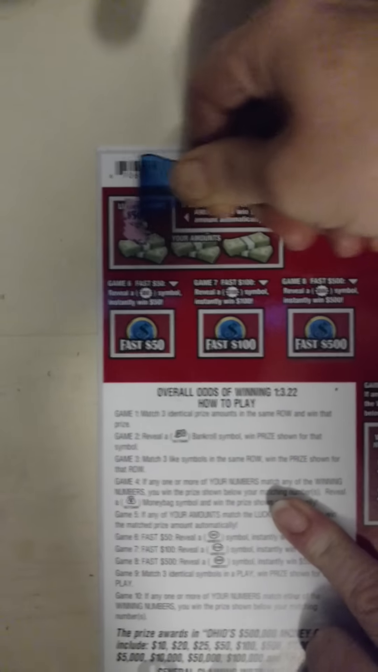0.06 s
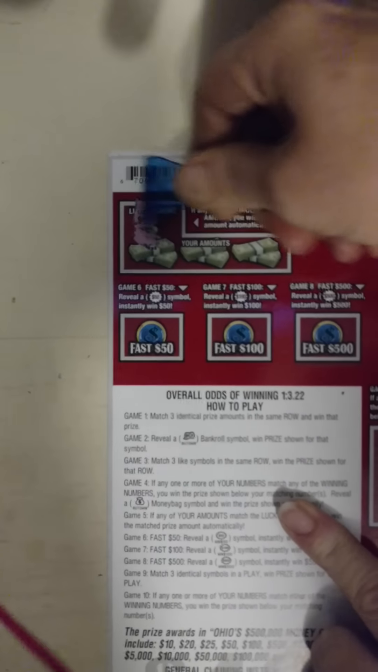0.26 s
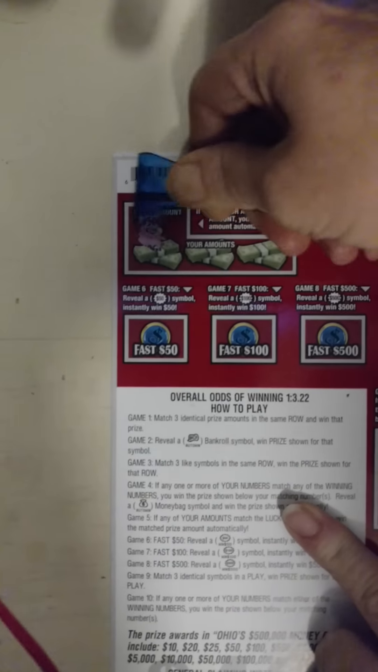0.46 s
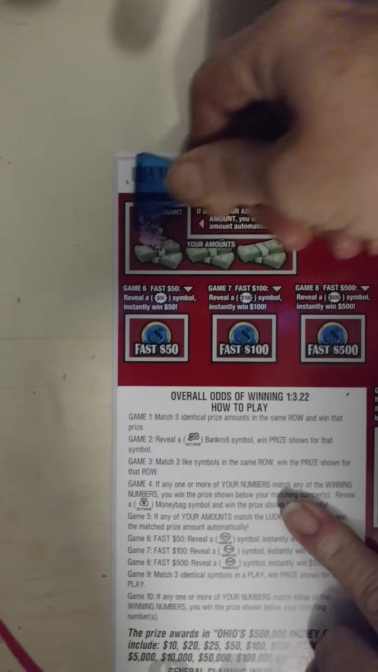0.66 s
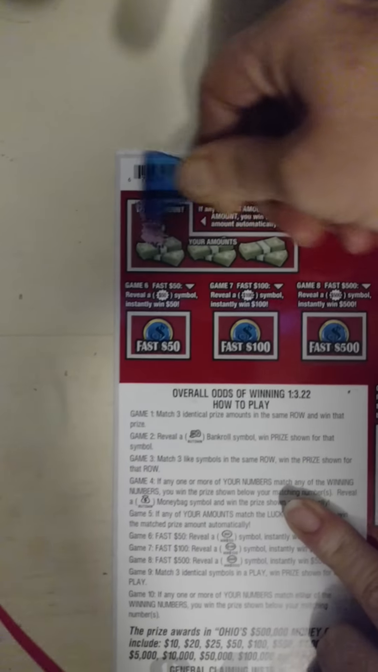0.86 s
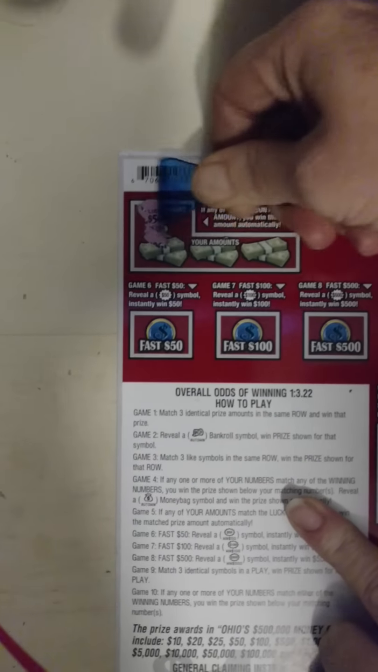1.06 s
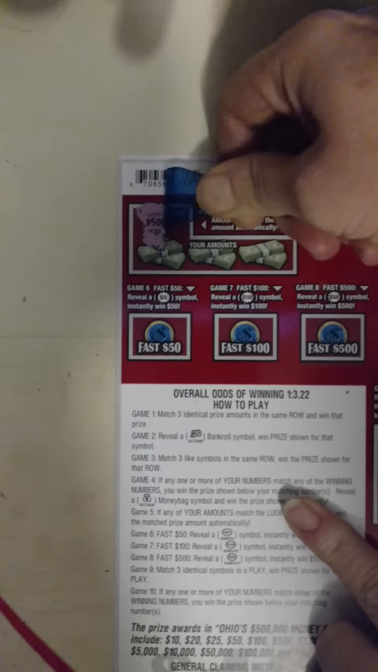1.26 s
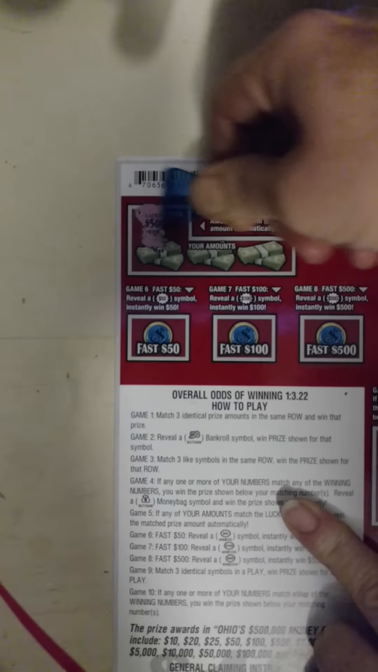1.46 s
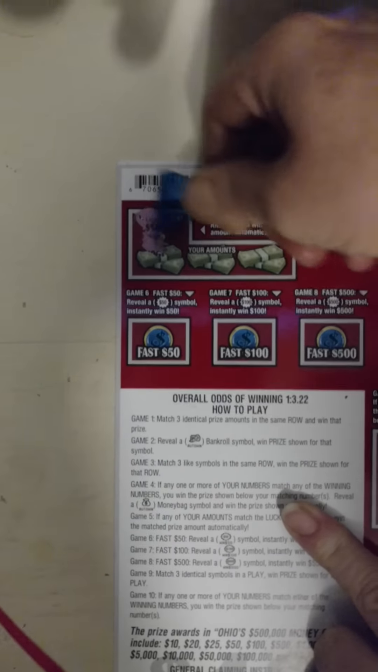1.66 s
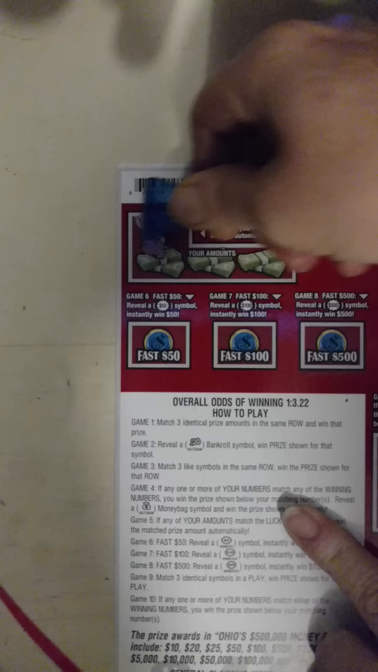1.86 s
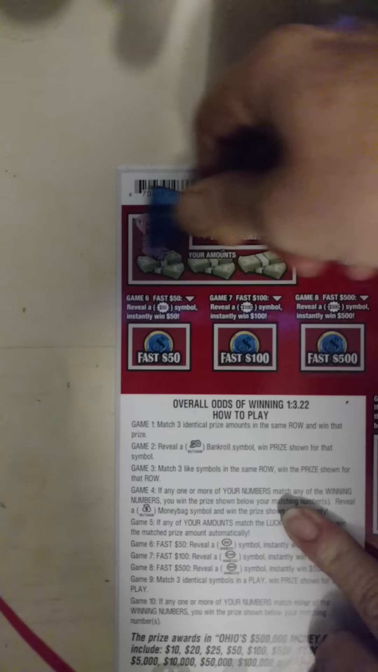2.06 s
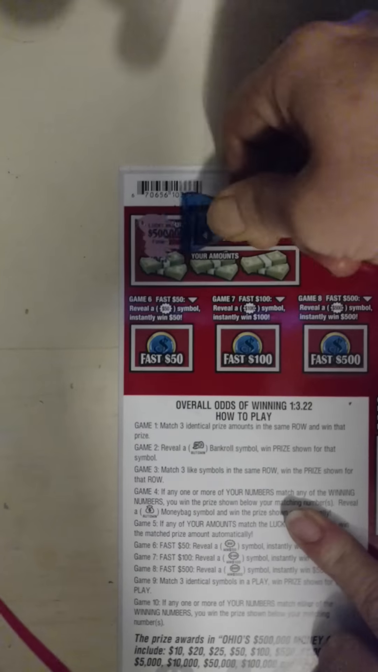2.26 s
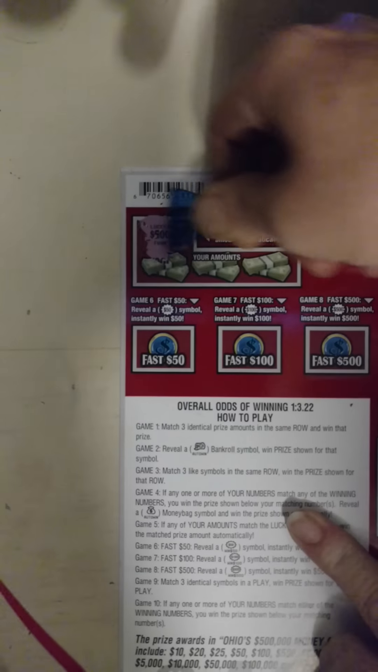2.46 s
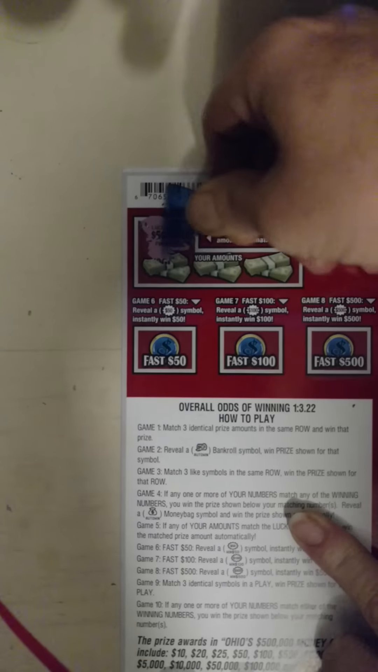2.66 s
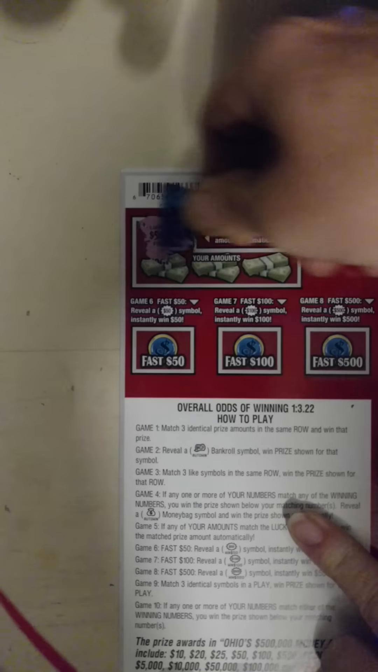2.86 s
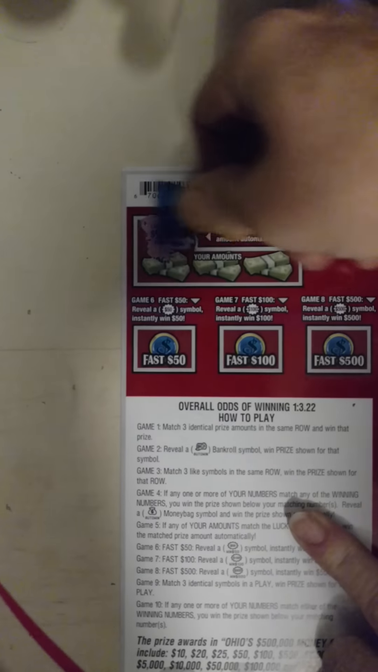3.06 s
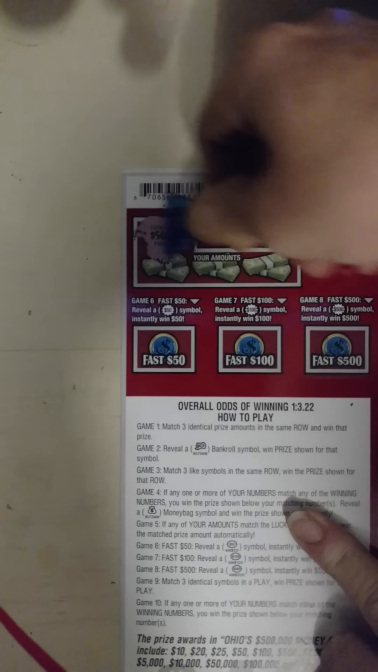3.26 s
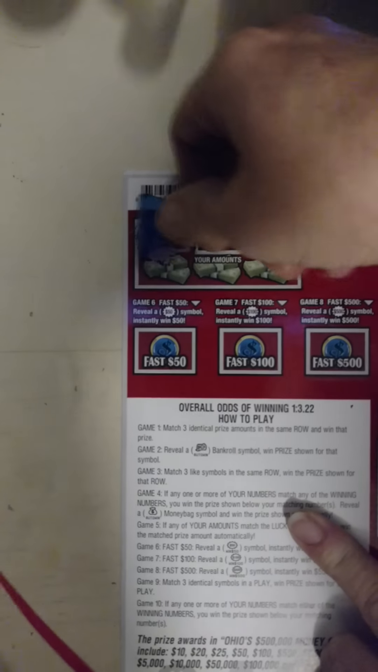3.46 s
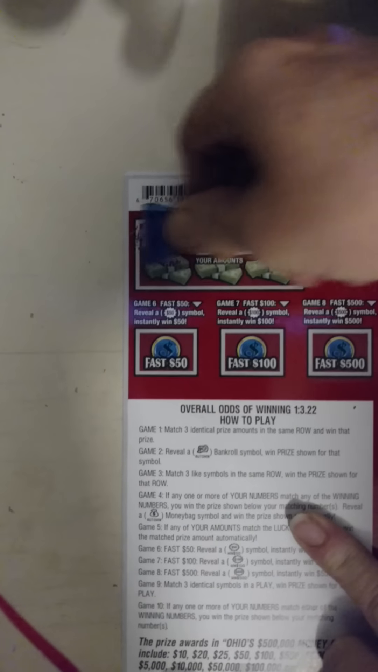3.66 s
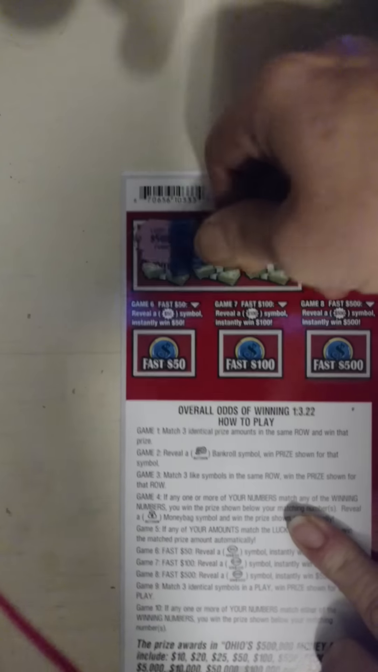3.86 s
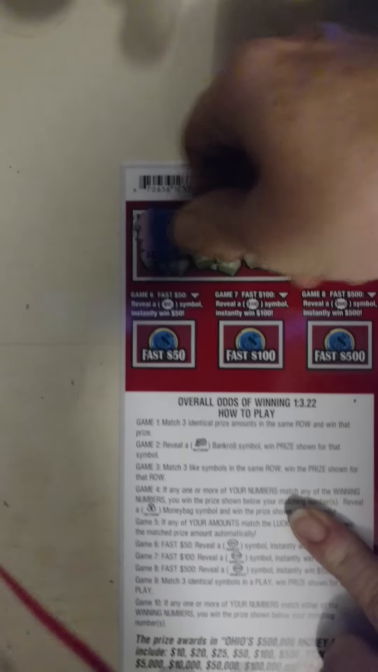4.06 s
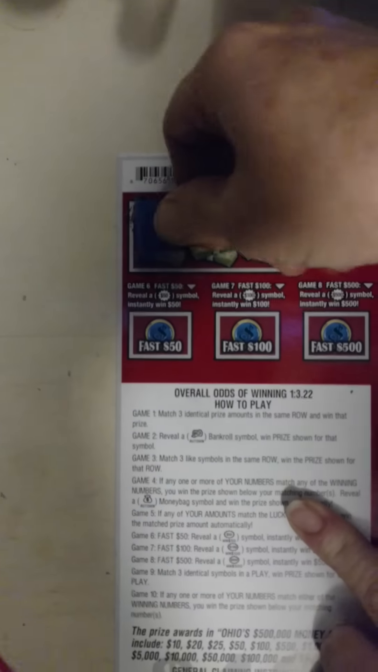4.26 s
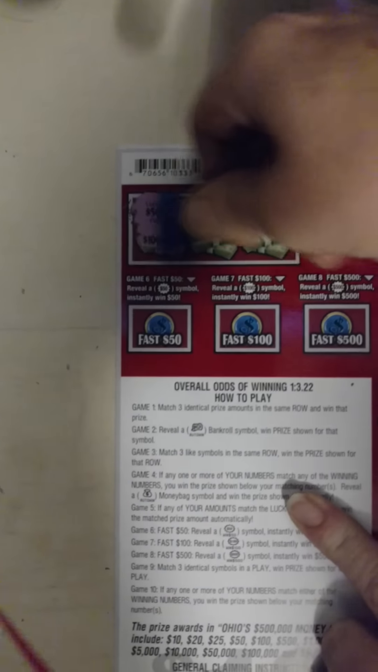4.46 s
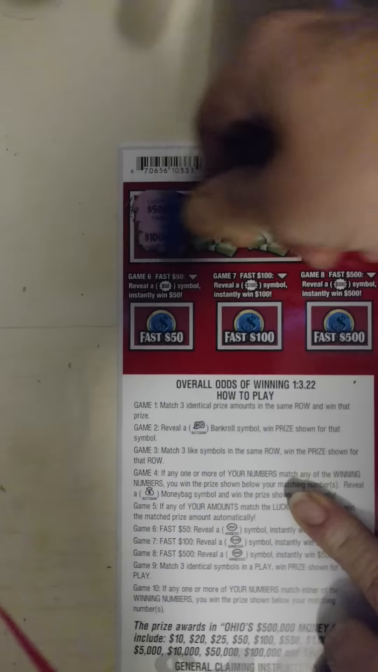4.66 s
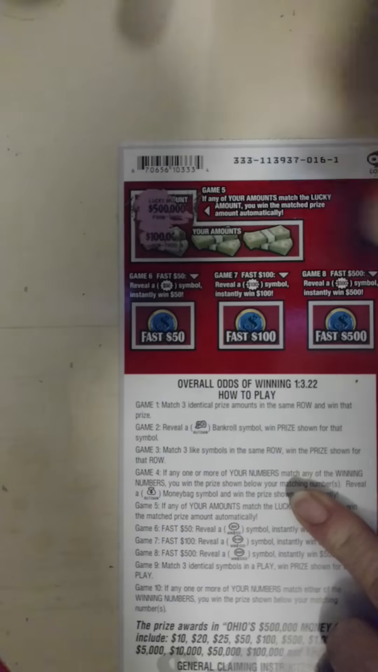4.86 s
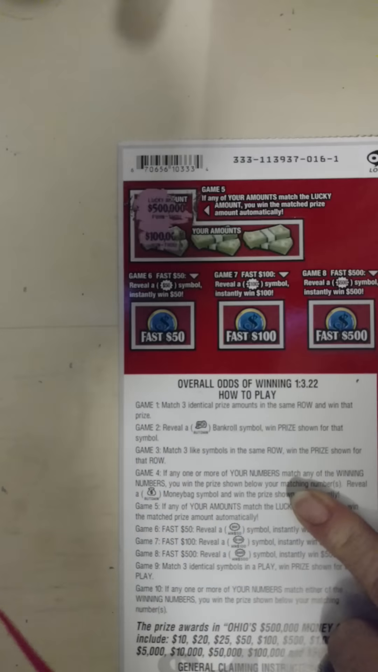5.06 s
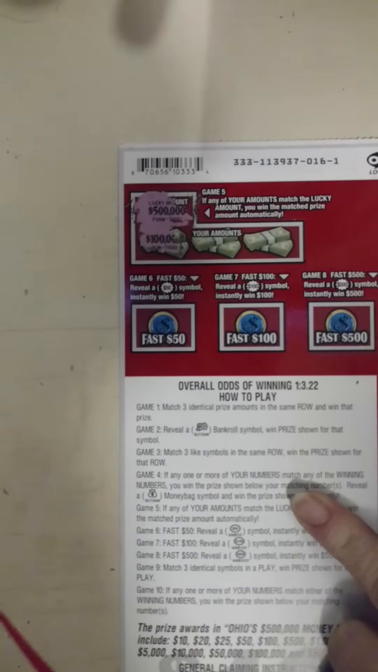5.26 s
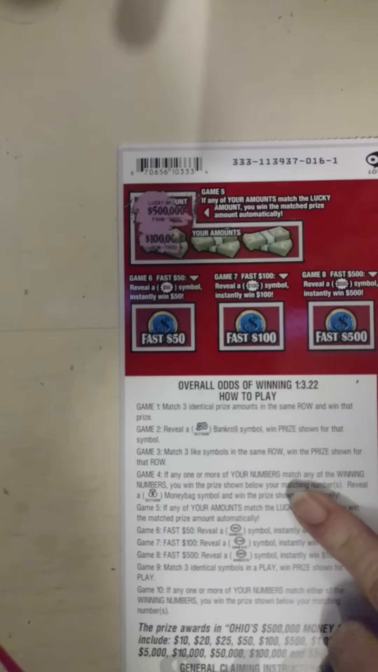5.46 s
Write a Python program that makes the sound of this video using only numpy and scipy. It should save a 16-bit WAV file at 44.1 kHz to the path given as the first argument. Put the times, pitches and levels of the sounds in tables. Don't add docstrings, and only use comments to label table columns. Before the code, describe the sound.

Quick irregular scratching strokes fizz and crackle on a card lying on a hollow table, with edge ticks and soft booms under the hand. One heavier bump comes early. After the last strokes there is a near-quiet moment, a hand lift and sleeve brush, then a tiny plastic clatter. Close, dry indoor stereo pickup with faint room noise.

```python
import sys
import numpy as np
from scipy import signal
from scipy.fft import rfft, irfft, next_fast_len
from scipy.io import wavfile
from scipy.ndimage import map_coordinates

SR = 44100
rng = np.random.default_rng(int(sys.argv[2]) if len(sys.argv) > 2 else 0)


def linear_from_db(decibels):
    return 10 ** (np.asarray(decibels, float) / 20)


def inscribe(sig):
    pcm = np.round(np.clip(np.atleast_2d(sig).T, -1, 1) * 32767)
    wavfile.write(sys.argv[1], SR, pcm.astype(np.int16))


N = 242991

# frequency in Hz, level in dB.
HUSH_SPECTRUM = [(20, 11), (60, 7.5), (150, 4.5), (400, -5), (1000, -15.5), (3000, -17), (10000, -25.5),
                 (16500, -37)]
# frequency in Hz, time to fall 60 dB in seconds.
ROOM_DECAY = [(150, 0.15), (1000, 0.46), (4000, 0.13), (12000, 0.064)]
# frequency in Hz, direct level in dB, scattered level in dB,
# direct phase in radians.
FAR_PORT = [(60, -5, -10, 0.4), (142, -4.5, -21, 0.18), (333, -4.5, -10.5, -0.27), (730, -6, -10, 0),
            (1200, -11, -6.5, -2), (1880, -14, -10.5, -3), (2970, -12.5, -7.5, -6),
            (15000, -20.5, -6, -5.5)]
# frequency in Hz, share fed across to the other port.
CROSSFEED = [(100, .86), (1300, .82), (2600, .92), (4000, .84), (5500, .6), (15000, .5)]

# frequency in Hz, width in Hz, level in dB.
TABLE_MODES = [(113.8, 33, -6), (136.4, 16.3, 3.5), (195.8, 24.8, 1.5), (225.6, 21.9, 2),
               (352.4, 25.3, -11), (471, 22, -19)]
# frequency in Hz, width in Hz, level in dB.
CARD_MODES = [(552, 40.4, 1.5), (643.5, 15.8, 1.5), (726, 61, -1.5), (915, 117, -3), (1117, 92, -3),
              (1332, 94, -0.5), (1620, 95, -0.5), (1848, 106, 0), (2150, 334, -8), (2614, 200, 0.5),
              (3037, 640, -6.5)]
# frequency in Hz, width in Hz, level in dB.
BLADE_MODES = [(3900, 690, -10), (4580, 790, 2), (5060, 893, 5), (6403, 880, 0.5), (8380, 460, -16),
               (9950, 530, -14), (12360, 2840, -15), (14380, 3500, -19)]
# frequency in Hz, width in Hz, level in dB.
SNAP_MODES = [(2700, 1200, -7), (5900, 2600, 0), (10000, 4000, -6), (14000, 4000, -4)]
# frequency in Hz, width in Hz, level in dB.
SCRAPER_MODES = [(3200, 600, -13.5), (3930, 240, 0), (4370, 360, -1.5), (5730, 790, 0.5), (7200, 500, 1.5),
                 (8000, 430, 7), (9200, 700, -2), (9900, 900, -1.5), (11700, 1100, -14), (13400, 1900, -13)]
# frequency in Hz, width in Hz, level in dB.
KNOCK_MODES = [(800, 320, 2), (1760, 630, 5)]
# frequency in Hz, width in Hz, level in dB.
SLEEVE_MODES = [(3280, 770, 3)]

# time in seconds, rustle in dB.
SLEEVE = [
    (4.72, -102),
    (4.96, -73.5),
    (5.1, -73),
    (5.51, -66.5),
]
# time in seconds, pitch in Hz, peak in dB.
SQUEAKS = [
    (4.411, 2230, -35),
]
# time in seconds, low ring in dB, high ring in dB,
# knock in dB.
DROP = [
    (5.3861, -29, -25.5, -55),
    (5.388, -15.5, -23, -55),
    (5.393, -14, -36, -37),
    (5.3966, -9.5, -26, -34.5),
    (5.399, -22, -32, -54),
    (5.4053, -30, -37, -59),
    (5.413, -17, -35, -45),
    (5.423, -26, -37.5, -42),
    (5.427, -27, -41, -25),
    (5.435, -47, -41, -45),
]
# time in seconds, peak in dB.
BUMPS = [
    (.570, -9),
    (5.142, -23),
    (5.419, -42),
    (5.423, -31),
]
# time in seconds, peak in dB.
TICKS = [(0.2143, -38), (0.64, -33.5), (0.7607, -34), (0.821, -38), (0.8603, -41), (0.924, -35.5),
         (1.363, -41), (1.5958, -37), (2.133, -44), (2.2323, -27), (2.9387, -38), (3.018, -46.5),
         (3.2681, -32), (3.4336, -30), (3.5164, -23.5), (3.721, -40)]
# time in seconds, peak in dB, upper modes in dB.
PUSHES = [(0.141, -27, -3.5), (0.451, -31, -3), (0.511, -26.5, -9), (0.567, -32, 1), (0.616, -27.5, -3),
          (0.852, -26.5, -16), (0.944, -26, -5), (1.579, -27.5, -1), (2.063, -31, 2), (2.237, -46, -12),
          (3.365, -27.5, -20), (3.469, -25.5, 7.5), (3.644, -35, 5.5), (3.724, -32, 7), (3.906, -33, 5.5),
          (5.141, -39, -20)]
# time in seconds, snap in dB, push in dB, upper modes in dB.
LANDINGS = [(0.0325, -20, -29.5, -1), (0.2628, -25.5, -29.5, -3.5), (0.3769, -42, -29.5, 3.5),
            (0.6885, -28.5, -41, 5.5), (1.0939, -34.5, -24, -1.5), (1.1989, -32, -29, 1.5),
            (1.3436, -21.5, -23, 4), (1.4527, -27, -29, 2), (1.5041, -41, -31, -1),
            (1.6854, -24, -28.5, 2.5), (1.8075, -30.5, -27.5, 6.5), (1.9494, -20.5, -30, 0),
            (2.1843, -34, -33.5, 2), (2.3301, -38, -26.5, 2), (2.4726, -23.5, -32, 2),
            (2.601, -23, -26, 3.5), (2.7122, -22.5, -34.5, 4), (2.8407, -34, -26, 0.5),
            (2.9883, -61, -38.5, 5.3), (3.0873, -21.5, -21, -0.5), (3.2392, -40.5, -32, -1.5),
            (4.0529, -23.5, -31, 0.5), (4.1788, -54, -35.5, 5), (4.3155, -46, -36, 3.5),
            (4.461, -46, -26.5, 1), (4.6093, -21.5, -36, 3.7)]
# time in seconds, weight of the hand in dB.
DRAG = [(0.0, -38.5), (0.43, -37.5), (0.77, -39), (1.27, -42), (1.41, -43.5), (1.58, -41.5), (1.72, -45.5),
        (1.86, -34.5), (1.98, -43.5), (2.36, -44), (2.79, -49), (2.89, -43.5), (3.25, -50), (3.44, -34),
        (3.57, -43.5), (3.88, -40.5), (4.58, -50), (4.71, -63)]
# start in seconds, length in seconds, peak position 0-1, fizz in dB,
# card minus fizz in dB.
STROKES_OUT = [(0.073, 0.054, 0, -56, -25), (0.156, 0.077, 0.55, -43.5, -2), (0.317, 0.029, .45, -46, -3.5),
               (0.393, 0.019, 0.2, -48, -1.5), (0.449, 0.021, 0.4, -41.5, -4.5), (0.508, 0.017, 1, -46, 4),
               (0.685, 0.033, 0.8, -45, -2.5), (0.733, 0.036, 0.64, -52.5, 5),
               (0.914, 0.033, .9, -45.5, -6), (0.974, 0.034, 0.54, -46.5, 2),
               (1.265, 0.027, 0.1, -39.5, -2.5), (1.505, 0.028, 0.53, -41.5, -1),
               (1.588, 0.022, 0.75, -42, 0.9), (1.729, 0.042, 0.42, -34.5, -2), (1.864, .05, .6, -56.5, -7),
               (2.004, 0.02, .05, -44, 0.3), (2.131, 0.015, .64, -45, -1), (2.212, 0.08, 0.63, -37, -3.5),
               (2.345, 0.051, 0.94, -40, 1.4), (2.513, 0.027, 0.14, -43.5, -4),
               (2.763, 0.033, 0.14, -44.5, -1.2), (2.843, 0.031, 0.85, -45.5, 1.2)]
# start in seconds, length in seconds, peak position 0-1, fizz in dB,
# card minus fizz in dB.
STROKES_BACK = [(3.142, 0.043, 0.18, -39, 0.2), (3.26, 0.018, 0.64, -48.5, -1),
                (3.31, 0.023, 0.53, -52.5, 1), (3.371, 0.028, 0.32, -62, 8),
                (3.433, 0.04, 0.15, -36.5, -0.5), (3.526, 0.019, 0.89, -52.5, -4),
                (3.581, 0.022, 0.33, -48.5, 2), (3.653, 0.024, .44, -45.5, 1.5),
                (3.715, 0.0216, 0.21, -42, -1.8), (3.796, 0.03, 0.29, -45, -3),
                (3.837, 0.032, 0.7, -40.5, -1.5), (3.937, 0.073, 0.52, -37.5, 0.5),
                (4.078, 0.051, 0.5, -43, -2.7), (4.198, 0.068, 0.37, -48.5, 3.5),
                (4.35, 0.062, 0.56, -40.5, -0.6), (4.469, 0.026, 0.74, -48.5, 3),
                (4.517, 0.042, 0.35, -48, 4.5)]


def unit(x):
    return x / np.sqrt(np.mean(x ** 2) + 1e-20)


def along(points, hz, axis=1):
    columns = np.transpose(points)
    return np.interp(np.log(hz + 1), np.log(columns[0] + 1), columns[axis])


def curve(rows):
    return np.interp(np.arange(N) / SR, *np.transpose(rows))


def filtered(x, response):
    size = next_fast_len(N + SR // 2)
    hz = np.fft.rfftfreq(size, 1 / SR)
    return irfft(rfft(x, size) * response(hz), size)[..., :N]


def soft(x, hz):
    return filtered(x, lambda f: 1 / (1 + 1j * f / hz) ** 2)


def ringing(x, modes):
    def body(f):
        total = 0
        for k, (centre, width, db) in enumerate(modes):
            damping = 1j * f * width
            total = total + (-1) ** k * linear_from_db(db) * damping / (centre * centre - f * f + damping)
        return total
    energy = np.mean(abs(body(np.arange(0, SR / 2, 2))) ** 2)
    return filtered(x, body) / np.sqrt(energy)


def grit(rate, spread_db):
    crumbs = rng.standard_normal(int(N * rate / SR) + 4)
    size = map_coordinates(crumbs, [np.arange(N) * rate / SR], order=1)
    return unit(rng.standard_normal(N) * linear_from_db(spread_db * size))


def impacts(times, db, t60, noisy, rise=1e-5):
    out = np.zeros(N + SR)
    t = np.arange(int(.03 * SR)) / SR
    crackle = noisy * rng.standard_normal((len(times), len(t)))
    crackle[:, 0] = 1
    late = t - rise
    swell = t / rise + (rise < 1e-4)
    crackle *= np.where(late < 0, swell, linear_from_db(-60 * late / t60))
    for s, level, row in zip(times, db, crackle):
        out[round(s * SR):][:len(t)] += linear_from_db(level) * row
    return out[:N]


def hush():
    noise = filtered(rng.standard_normal((2, N)), lambda hz: linear_from_db(along(HUSH_SPECTRUM, hz)))
    near, far = linear_from_db(-56.5) * unit(noise)
    shared = soft(near, 680)
    return np.array([near, far + .5 * shared - 0.3 * soft(far, 660)])


def tails(size, t60_scale):
    hz, t, z = signal.stft(rng.standard_normal((2, size)), SR, nperseg=256)
    t60 = t60_scale * along(ROOM_DECAY, hz)[:, None]
    tail = signal.istft(z * linear_from_db(-60 * t / t60), SR, nperseg=256)[1]
    return tail / np.linalg.norm(tail, axis=1, keepdims=True)


def ports(x, room_db):
    def shadow(hz):
        return linear_from_db(along(FAR_PORT, hz)) * np.exp(1j * along(FAR_PORT, hz, axis=3))
    direct = filtered(x, shadow)
    drift = np.linspace(0, 39, N)
    poses = np.array([map_coordinates(row, [drift], order=1) for row in rng.standard_normal((6, 40))])
    poses /= np.linalg.norm(poses, axis=0)
    echoes = np.concatenate([tails(size=2048, t60_scale=.12) for _ in range(3)])
    scatter = signal.oaconvolve(x * poses, echoes, axes=1)[:, :N].sum(axis=0)
    far = direct + filtered(scatter, lambda hz: linear_from_db(along(FAR_PORT, hz, axis=2)))
    delayed = np.pad(x, (200, 0))[None]
    room = signal.fftconvolve(delayed, tails(size=SR // 3, t60_scale=1), axes=1)[:, :N]
    return np.array([x, far]) + linear_from_db(room_db) * room


def squeaks():
    t = np.arange(N) / SR
    out = np.zeros(N)
    for s, hz, db in SQUEAKS:
        swell = np.exp(-((t - s - .003) / 0.0027) ** 2)
        out += linear_from_db(db) * swell * np.sin(2 * np.pi * hz * t)
    return out


def drop():
    rise_s = .0018
    s, low_db, high_db, knock_db = np.transpose(DROP)
    low = ringing(impacts(s, low_db, 0.0033, 0.5, rise_s), SCRAPER_MODES[:3])
    high = ringing(impacts(s, high_db + 4.0, 0.034, 0.55, rise_s), SCRAPER_MODES[3:])
    knock = ringing(impacts(s, knock_db, 0.0054, 0.56, rise_s), KNOCK_MODES)
    return low + high + knock


def table_pushes():
    lead_s = 0.0021
    landed = [(s - lead_s, push_db, upper_db) for s, _, push_db, upper_db in LANDINGS]
    leaned = [(s + 0.94 * length, db + card_db + 11 - 8, 8)
              for s, length, _, db, card_db in STROKES_OUT + STROKES_BACK]
    s, db, upper_db = np.transpose(landed + PUSHES + leaned)
    low = ringing(impacts(s + 0.0021, db + 25, 0.0095, 0.039), TABLE_MODES[:2])
    upper = ringing(impacts(s + 0.0018, db + upper_db + 25.0, 0.0076, 0.044), TABLE_MODES[2:])
    return soft(low + upper, 800)


def bumps():
    s, db = np.transpose(BUMPS)
    thud = ringing(impacts(s, db, 0.027, 0.0064), [(186, 360, 0)])
    return soft(ringing(thud, [(134, 150, 0)]), 240)


def edge_catches():
    landed = [(s, db, (1 - 0.38) * (push_db - db) - 10.5) for s, db, push_db, _ in LANDINGS]
    ticked = [(s, db, -15.5) for s, db in TICKS]
    s, db, card_db = np.transpose(landed + ticked)
    snap = ringing(impacts(s + .0008, db + 11, .008, .06), SNAP_MODES)
    shiver = ringing(impacts(s + .001, db - 5, .016, .5), BLADE_MODES)
    slap = ringing(impacts(s + 0.00041, db + card_db + 13.5, 0.016, 0.39), CARD_MODES)
    return snap + shiver + slap


def pressure():
    attack_s, release_s = 0.0047, 0.016
    t = np.arange(SR // 4) / SR
    gains = np.zeros((3, N + SR))
    for s, length, top, db, card_db in STROKES_OUT + STROKES_BACK:
        knots = attack_s + length * np.array([0, np.clip(top, .05, .95), 1])
        times = [0, *knots, knots[2] + release_s]
        shape = linear_from_db(np.interp(t, times, [-21, -5, 3.5, -3.5, -38.5], right=-200))
        sheen_db = -11.5 + 0.2 * s + 0.16 * card_db
        layers_db = db + np.array([[0], [card_db], [sheen_db]])
        gains[:, round((s - attack_s) * SR):][:, :len(t)] += linear_from_db(layers_db) * shape
    for s, _, push_db, _ in LANDINGS:
        skid = linear_from_db(push_db - 27 - 60 * t / .25)
        gains[:, round(s * SR):][:, :len(t)] += skid * linear_from_db(np.array([[-5], [0], [-15]]))
    return gains[:, :N]


def scraping():
    fizz, card, sheen = pressure()
    drag_db = curve(DRAG)
    sleeve = linear_from_db(curve(SLEEVE))
    heavier_db = drag_db + 41
    light_card = linear_from_db(-57 + 1.05 * heavier_db) + linear_from_db(2) * sleeve
    light_fizz = linear_from_db(-65.5 + 1.33 * heavier_db) + sleeve
    crumbs = grit(900, 3.55)
    dust_grit = 0.47 * crumbs + 1.01 * grit(1500, 4.6)
    paper_grit = 0.79 * crumbs + 0.64 * grit(300, 3.15)
    blade = ringing((linear_from_db(-0.5) * fizz + light_fizz) * crumbs, BLADE_MODES[:4])
    dust = ringing((linear_from_db(-0.5) * sheen + linear_from_db(-7.5) * light_fizz) * dust_grit, BLADE_MODES[4:])
    paper = ringing((linear_from_db(-0.5) * card + light_card) * paper_grit, CARD_MODES)
    boom = ringing((linear_from_db(3.0) * card + linear_from_db(drag_db)) * grit(40, 3.4), TABLE_MODES)
    rustle = ringing(linear_from_db(1.5) * sleeve * grit(400, 1.8), SLEEVE_MODES)
    return blade + dust + paper + boom + rustle


def scene():
    hand_work = squeaks() + table_pushes() + bumps() + edge_catches() + scraping()
    return hush() + ports(drop(), -15.5) + ports(hand_work, -20.0)


def top_cut(x):
    return signal.sosfilt(signal.butter(12, 16830, fs=SR, output="sos"), x)


def record(dry):
    widen_s = 17 / SR
    bass_cut = filtered(dry, lambda hz: 1j * hz / (55 + 1j * hz))
    heard = filtered(bass_cut, lambda hz: (hz < 16800) / np.sqrt(1 + (hz / 15250) ** 70))
    crossed = filtered(heard[::-1], lambda hz: along(CROSSFEED, hz) * np.exp(-2j * np.pi * hz * widen_s))
    return top_cut(heard - crossed)


dry = scene()
out = record(dry)
inscribe(out)
```